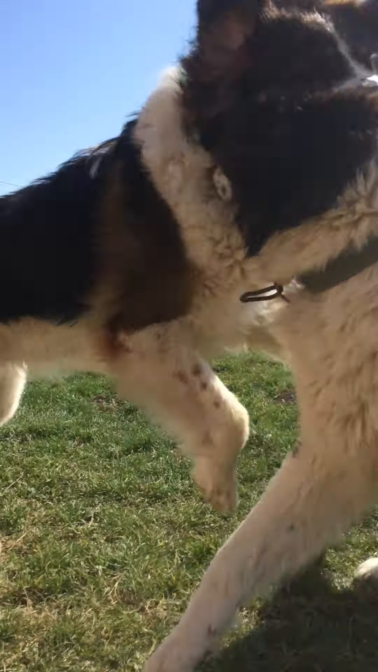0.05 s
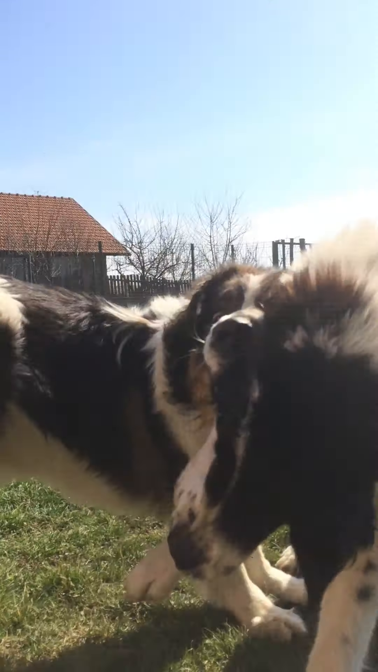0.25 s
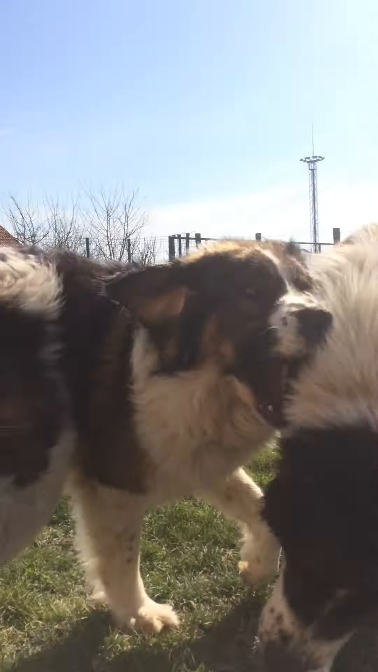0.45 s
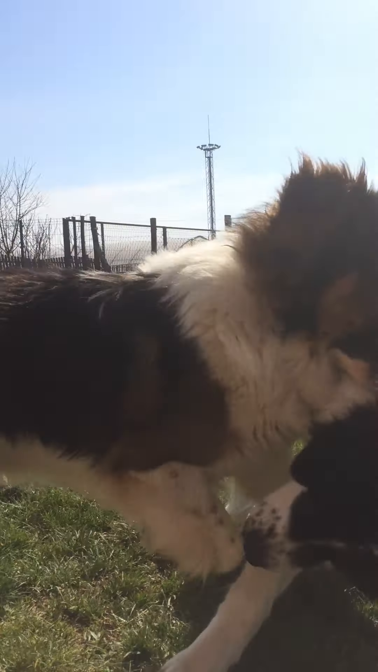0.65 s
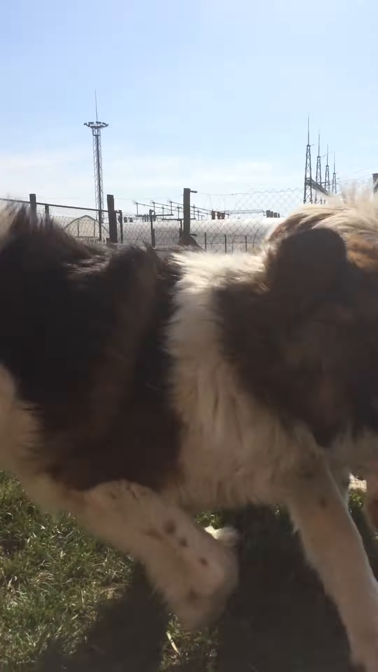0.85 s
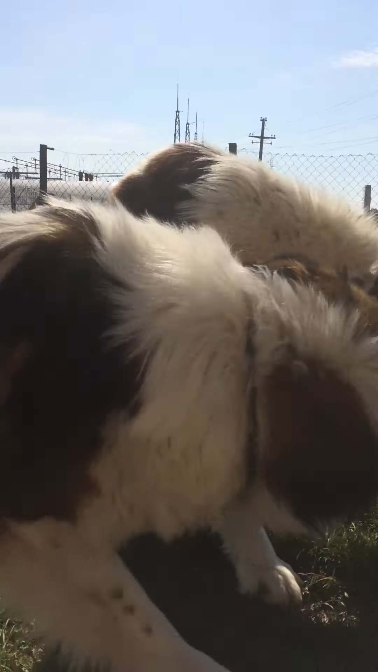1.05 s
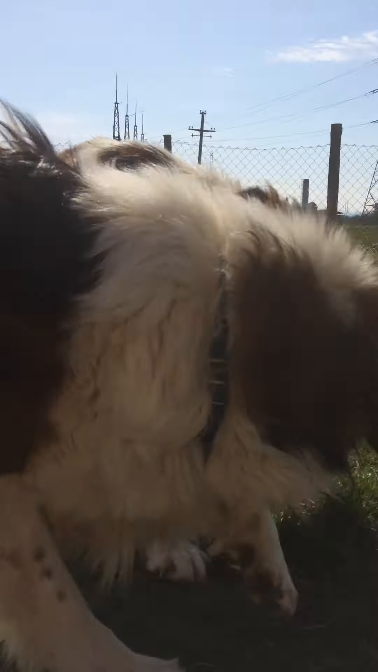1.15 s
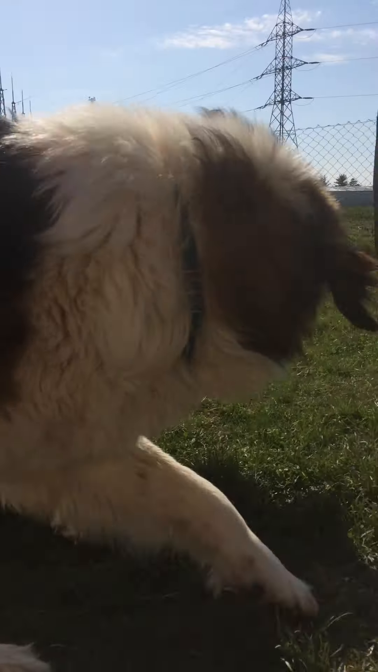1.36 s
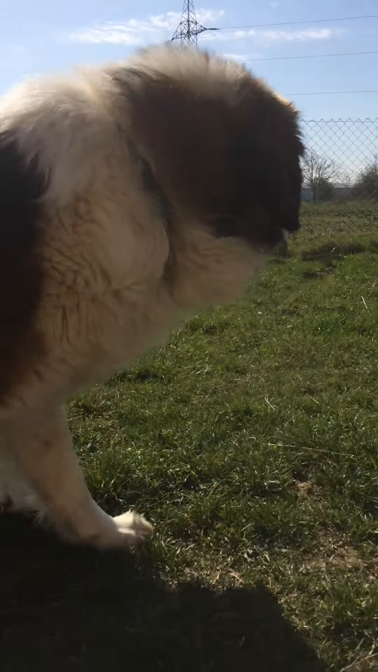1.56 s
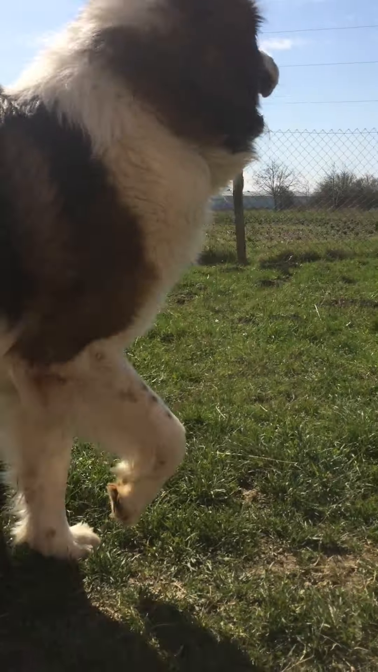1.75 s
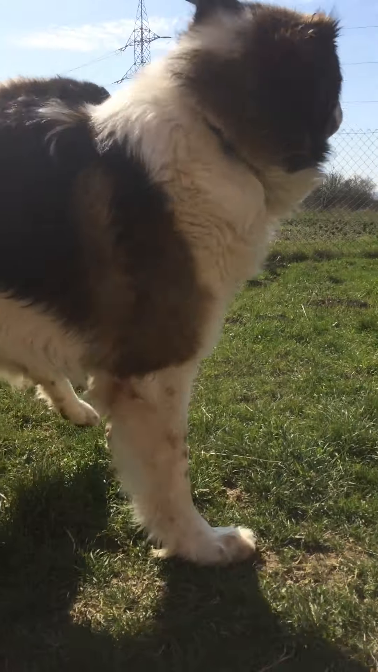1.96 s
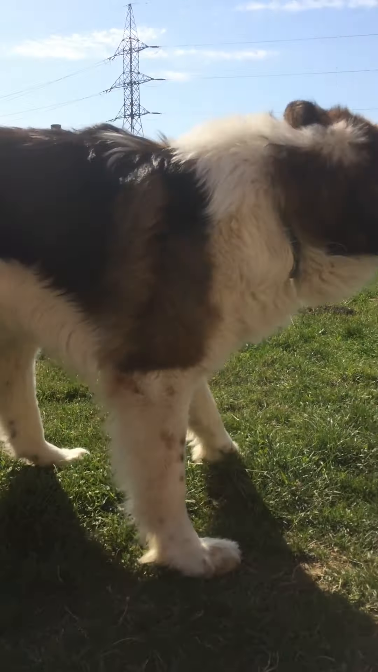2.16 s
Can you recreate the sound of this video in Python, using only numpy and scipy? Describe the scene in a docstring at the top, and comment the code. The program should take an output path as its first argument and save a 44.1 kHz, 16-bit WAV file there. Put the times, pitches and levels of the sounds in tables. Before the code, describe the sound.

Dog growl bursting into a rough bark-like huff, then soft panting, collar tag clinks and grass scuffles

```python
"""Large dogs jostle on grass near a phone, in the open air over a mains hum and a low rumble.
First a snatch of breath, a paw thud and tag clinks; then one dog growls from slow vocal pulses,
huffs hard through its mouth resonances with a hoarse harmonic yelp, and grunts with two puffs.
Thin nasal whistles and panting of shaped noise follow. Throughout, paws thud as decaying tones with
noise puffs, a collar tag rings in decaying modes, and legs brush the grass as dense tiny snaps."""
import sys
import numpy as np
from scipy import signal
from scipy.fft import rfft, irfft
from scipy.io import wavfile
from scipy.ndimage import uniform_filter1d

SR = 44100
rng = np.random.default_rng(int(sys.argv[2]) if len(sys.argv) > 2 else 0)


def rack_gain(trim_db):
    """Turn a fader trim in dB into the linear factor to multiply a signal by."""
    fader = np.asarray(trim_db, float)
    return 10 ** (fader / 20)


def int16_out(signal):
    """Quantize to a 16-bit WAV file."""
    q = np.round(np.clip(np.atleast_2d(signal).T, -1, 1) * 32767)
    wavfile.write(sys.argv[1], SR, q.astype(np.int16))


N = 97020  # samples

# Spectrum of breath hiss and of a paw's puff: (frequency [Hz], relative density [dB per Hz])
HISS_SPECTRUM = [(150, 2), (1000, 4), (2450, -3.5), (2950, -7), (3600, -4), (6000, -12.5), (16000, -20)]
# Legs brushing grass and fur, which also drives the ground rumble: (time [s], level [dB])
LEGWORK = [(0, -61.5), (.19, -57.5), (.255, -52), (.29, -64), (.52, -41.5), (.57, -55.5), (.95, -53),
           (1.04, -44.5), (1.07, -50), (1.1, -48.5), (1.18, -67), (1.385, -56.5), (1.54, -59),
           (1.58, -62.5), (1.76, -62), (1.82, -67.5), (2.2, -61)]
WOBBLE_HZ = 24.6  # tongue and lips keep the mouth resonances moving up to about this rate


def evened(x):
    """Scales to rms 1."""
    return x / np.sqrt(np.mean(x ** 2) + 1e-20)


def add(mix, s, sound):
    """Mixes a sound in at s seconds."""
    part = mix[max(round(s * SR), 0):][:len(sound)]
    part += sound[:len(part)]


def resonate(x, hz, width):
    """A resonance of gain 1 that may follow a curve: shift down to 0 Hz, smooth, shift back."""
    turn = np.exp(2j * np.pi * np.cumsum(hz * np.ones(len(x))) / SR)
    r = np.exp(-np.pi * abs(width) / SR)
    return 2 * (turn * signal.lfilter([1 - r], [1, -r], x / turn)).real


def coloured(x, points):
    """Gives x the spectrum of the table, rms 1."""
    hz = np.fft.rfftfreq(len(x), 1 / SR)
    f, db = np.transpose(points)
    gain = rack_gain(np.interp(np.log(hz + 1), np.log(f + 1), db))
    return evened(irfft(rfft(x) * gain, len(x)))


def wander(count, hz):
    """Slow chance up to about hz, rms 1 before its ends are trimmed."""
    width = max(int(SR / hz / 2), 1)
    smooth = uniform_filter1d(rng.standard_normal(count + 2000), width)
    return evened(uniform_filter1d(smooth, width))[1000:-1000]


def curves(rows):
    """Joins the rows of a table by straight lines; the last item marks where it sounds."""
    s, *cols = np.transpose(rows)
    t = np.arange(N) / SR
    return [np.interp(t, s, c) for c in cols] + [(t > s[0]) & (t < s[-1])]


def yard():
    """Mains hum, a lumpy low rumble that follows the legwork, and the open-air noise floor."""
    # Spectrum of the open air: (frequency [Hz], relative density [dB per Hz])
    air_spectrum = [(25, -16), (150, 2.5), (250, -15.5), (1000, -13), (3000, -31.5), (16000, -29)]
    hum_hz, hum_db, air_db = 100, -55, -61.5
    rumble_hz, rumble_width_hz = 67, 13
    hum = rack_gain(hum_db) * np.sqrt(2) * np.sin(2 * np.pi * hum_hz * np.arange(N) / SR)
    low = resonate(rng.standard_normal(N), rumble_hz, rumble_width_hz)
    low = resonate(low, rumble_hz, rumble_width_hz)
    rumble = rack_gain(-33.5 + 0.49 * curves(LEGWORK)[0]) * evened(low)  # 0.49 dB per dB of legwork
    air = rack_gain(air_db + 2 * wander(N, 2.0)) * coloured(rng.standard_normal(N), air_spectrum)
    return hum + rumble + air


def rustle():
    """Dense tiny snaps of grass blades under moving legs, over a smoother noise."""
    # Spectrum of brushed grass: (frequency [Hz], relative density [dB per Hz])
    grass_spectrum = [(120, 4), (300, -1.5), (900, -3.5), (5000, -8), (16000, -8)]
    grains_per_s, grain_spread_db = 5000, 5
    snap_size = rack_gain(grain_spread_db * np.minimum(rng.exponential(1, N), 5))
    struck = rng.random(N) < grains_per_s / SR
    snaps = snap_size * struck * rng.standard_normal(N)
    brushing = coloured(snaps + 1.38 * rng.standard_normal(N), grass_spectrum)
    return rack_gain(curves(LEGWORK)[0] + 2 * wander(N, 25)) * brushing


def thud(s, db, hz):
    """A paw lands: a dull push and a puff of crushed grass, decaying together."""
    t60_s, attack_s, puff_db = 0.037, 0.0022, -7
    t = np.arange(3000) / SR
    push = np.sin(2 * np.pi * hz * t)
    puff = rack_gain(puff_db) * coloured(rng.standard_normal(len(t)), HISS_SPECTRUM)
    return s, rack_gain(db - 60 * t / t60_s) * np.minimum(t / attack_s, 1) * (push + puff)


def clink(s, ring_db, click_db):
    """The metal tag ticks against its ring; the lower modes weaken faster than a softening tick."""
    # Modes of the tag: (frequency [Hz], relative level [dB], 60 dB decay time [s])
    tag_modes = [(2640, -17, 0.012), (7250, -2, 0.023), (9950, -4, 0.022), (13620, 7, 0.017),
                 (13890, 7.5, 0.048)]
    body_under_hz, soft_loss, hard_db = 12000, 0.87, -23.5
    click_hz, click_t60_s = 2760, 0.033
    t = np.arange(4000) / SR
    body_db = click_db + soft_loss * (click_db - hard_db)
    ring = 0
    for hz, db, t60 in tag_modes:
        luck_db, phase = rng.random(2) * (2.0, 1)  # phase in turns
        drive_db = body_db if hz < body_under_hz else ring_db
        ring = ring + rack_gain(drive_db + db + luck_db - 60 * t / t60) * np.sin(2 * np.pi * (hz * t + phase))
    highpass = signal.butter(2, click_hz, "high", fs=SR, output="sos")
    tick = signal.sosfilt(highpass, rng.standard_normal(len(t)))
    tick = rack_gain(click_db - 3.0 - 60 * t / click_t60_s) * tick
    return s, (ring * np.minimum(t / 0.0008, 1) + tick) / 2


def whistle(start, length, hz, db):
    """A thin tone from the nose that swells late and stops."""
    t = np.arange(0, length, 1 / SR)
    swell = np.sin(np.pi * (t / length) ** 2) ** .5
    return start, rack_gain(db) * swell * np.sin(2 * np.pi * hz * t)


def pant(start, length, db, side_hz, main_hz, other_side_hz, rising, hiss_db, side_db):
    """Turbulent breath through the open mouth's three moving resonances, swelling and fading."""
    # Nominal resonance width [Hz]: one side, the main, the other side
    pant_widths = (260, 190, 260)
    fade_db, wobble = -26, .025
    u = np.arange(0, length, 1 / SR) / length
    count = len(u)
    away = np.where(u < rising, 1 - u / rising, (u - rising) / (1 - rising))  # 0 at the peak
    air = rng.standard_normal((2, 12000))[:, :count] * rack_gain(2.1 * wander(12000, 63))[:count]
    mouth = 0
    for hz, width, gain_db in zip((side_hz, main_hz, other_side_hz), pant_widths, (side_db, 0, side_db)):
        moved = hz * (1 + wobble * wander(12000, WOBBLE_HZ)[:count])
        mouth = mouth + rack_gain(gain_db) * resonate(resonate(air[0], moved, width), moved, 1.16 * width)
    breath = evened(mouth) + rack_gain(hiss_db) * coloured(air[1], HISS_SPECTRUM)
    return start, rack_gain(db + fade_db * away ** 1.92) * breath


def yelp():
    """A short high voice with a shaky pitch; its overtones die first as the effort drops."""
    # Hoarse yelp within the huff: (time [s], pitch [Hz], level [dB])
    yelp_rows = [(.457, 640, -40), (.465, 666.3, -16), (.474, 694.7, -33.5), (.484, 695.5, -17.5),
                 (.492, 707, -38), (.499, 719, -25.5), (.512, 718, -40), (.55, 692, -47.5)]
    # Harmonics from the fundamental up: relative level at full effort [dB]
    harmonics = (2, 2, -20, -7.5)
    overtones_grow, hoarse = 0.64, 0.031  # extra dB per dB of effort; pitch shake as a share
    hz, db, voiced = curves(yelp_rows)
    turns = np.cumsum(hz * (1 + hoarse * wander(N, 150))) / SR
    voice = 0
    for k, g in enumerate(harmonics):
        effort_db = overtones_grow * (k > 0) * (db - db.max())
        voice = voice + rack_gain(g + effort_db) * np.sin(2 * np.pi * (k + 1) * turns)
    return voiced * rack_gain(db) * voice


def growl():
    """Slow uneven vocal pulses ring the throat; breath, gated by each pulse, rasps through the mouth."""
    # Growl, then grunt: (time [s], pitch [Hz], chest tone [dB], throat rattle [dB])
    voice_rows = [(.222, 70, -52, -58), (.245, 70, -40, -41), (.285, 73, -31, -36), (.31, 83.6, -31, -29.5),
                  (.33, 112, -47, -42.5), (.385, 112.9, -31, -43.5), (.42, 119, -40, -50),
                  (.45, 151.8, -27.5, -39), (.475, 118.5, -44, -34), (.505, 95.3, -31, -44),
                  (.56, 87.5, -29.5, -40.5), (.6, 75.54, -48.5, -51), (.65, 95.34, -45, -52.5),
                  (.695, 100, -35, -39.5), (.765, 88, -43.5, -63), (.8, 87.8, -64, -39.5)]
    # Rasp, hard huff, the grunt's two puffs: (time [s], level [dB], lowest mouth resonance [Hz])
    breath_rows = [(.3, -52, 600), (.316, -41.5, 570), (.35, -38, 556), (.385, -40.5, 560),
                   (.425, -38.5, 590), (.448, -26.5, 670), (.466, -26, 670), (.488, -27, 730),
                   (.5, -49.5, 660), (.565, -57, 650), (.645, -57.5, 860), (.668, -45.5, 852),
                   (.697, -34, 934), (.722, -33.5, 833), (.752, -43, 805), (.766, -38, 930), (.8, -46, 893),
                   (.83, -67, 789.6)]
    # Throat resonances: (frequency [Hz], width of each of two passes [Hz], relative level [dB])
    throat_rows = [(370, 247, 3.5), (497, 73, -4)]
    # Mouth resonances at rest: (frequency [Hz], width of the first pass [Hz], relative level [dB])
    mouth_rows = [(664, 213, 9), (1356, 142, 2.5), (1876, 305, -0.5), (2676, 263, -7), (4070, 1200, -18)]
    jitter, gate, rasp, wobble = 0.0702, 0.33, 0.63, 0.048
    flutter_db, flutter_hz, chest_flutter_db, octave_db = 2, 70, 3.5, -11
    upper_follow = 0.82  # upper resonances move less than the lowest
    # the hiss and the lowest resonance rise faster than the effort: extra dB per dB
    hiss_grows, lowest_grows = 0.11, 0.16
    hz, chest_db, throat_db, voiced = curves(voice_rows)
    breath_db, mouth_hz, blowing = curves(breath_rows)
    turns = np.cumsum(hz * (1 + jitter * wander(N, 40.7))) / SR

    gating = 1 + gate * np.cos(2 * np.pi * turns)
    air = rng.standard_normal((3, N)) * gating * rack_gain(flutter_db * wander(N, flutter_hz))
    pulses = np.diff(np.floor(turns), prepend=0)  # one per vocal turn
    pulses = evened(pulses * rack_gain(4.1 * wander(N, 73))) + rasp * air[2]
    throat = sum(rack_gain(db) * resonate(resonate(pulses, f, w), f, w) for f, w, db in throat_rows)

    mouth = 0
    opening = mouth_hz / mouth_rows[0][0]
    for k, (f, w, db) in enumerate(mouth_rows):
        moved = f * opening ** (upper_follow if k else 1) * (1 + wobble * wander(N, WOBBLE_HZ))
        effort_db = (k == 0) * lowest_grows * (breath_db - breath_db.max())
        band = resonate(resonate(air[0], moved, w), moved, 3 * w)
        mouth = mouth + (-1) ** k * rack_gain(db + effort_db) * band  # alternating sign
    breath = evened(mouth) + rack_gain(-2.5 + hiss_grows * breath_db) * coloured(air[1], HISS_SPECTRUM)

    octave = rack_gain(octave_db) * np.sin(2 * 2 * np.pi * turns)
    chest = np.sqrt(2) * (np.sin(2 * np.pi * turns) + octave)
    chest = rack_gain(chest_db + chest_flutter_db * wander(N, 43.5)) * chest
    voice = chest + rack_gain(throat_db) * evened(throat)
    return voiced * voice + blowing * rack_gain(breath_db) * breath


def scene():
    """The whole yard on one channel, as heard at the phone."""
    # Paws landing: (time [s], level before decay [dB], push frequency [Hz])
    paw_rows = [(.012, -34.5, 92), (.872, -40, 168.2), (1.082, -33, 109), (1.384, -41.5, 327),
                (1.823, -49, 696), (2.018, -46, 743)]
    # Tag clinks, levels before halving: (time [s], ring [dB], click [dB])
    clink_rows = [(0.0179, -49, -48), (0.136, -66, -35.5), (0.1987, -21, -20), (0.206, -21, -22),
                  (0.2589, -35.5, -30), (0.929, -40.5, -41), (.970, -41.5, -51), (1.273, -36, -38),
                  (1.532, -49, -37), (1.9792, -54, -40), (2.068, -50, -54)]
    # Faint nasal whistles: (start [s], length [s], pitch [Hz], peak level [dB])
    whistle_rows = [(0.834, 0.11, 1080, -56), (1.241, 0.14, 1095, -55)]
    # Pants: (start [s], length [s], level [dB], one side, the main and another side mouth
    # resonance, in no order of pitch [Hz], share of the length spent rising,
    # hiss relative to the mouth [dB], side resonances relative to the main [dB])
    pant_rows = [(0.0, 0.039, -39.5, 460, 740, 1246, 0.16, -36, -4.5),
                 (.97, 0.26, -54, 550, 950, 2470, 0.32, -5.5, -6.5),
                 (1.155, 0.22, -41, 1910, 1057, 400, 0.38, -5, -11),
                 (1.451, 0.25, -58.5, 960, 2400, 1870, 0.29, -2, -12.5),
                 (1.644, 0.17, -44, 1750, 746, 1080, 0.31, 2, -3.5),
                 (2.105, 0.2, -50, 1100, 727, 493, 0.2, -14.5, -5.5)]
    mix = yard() + rustle() + yelp() + growl()
    sources = ((thud, paw_rows), (clink, clink_rows), (whistle, whistle_rows), (pant, pant_rows))
    for source, table in sources:
        for row in table:
            add(mix, *source(*row))
    return mix[None]


def band_limit(x):
    """A steep low-pass at the top of the band."""
    return signal.sosfilt(signal.butter(12, 16970, fs=SR, output="sos"), x)


def record(dry):
    """The mix loses its treble above 16 kHz."""
    lowpass = signal.firwin(255, 16000, fs=SR)
    finished = signal.oaconvolve(dry, lowpass[None], "same")
    return band_limit(finished)


dry = scene()
out = record(dry)
int16_out(out)
```